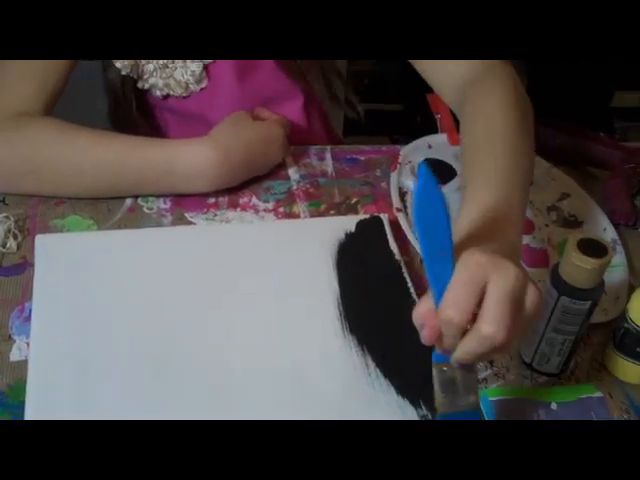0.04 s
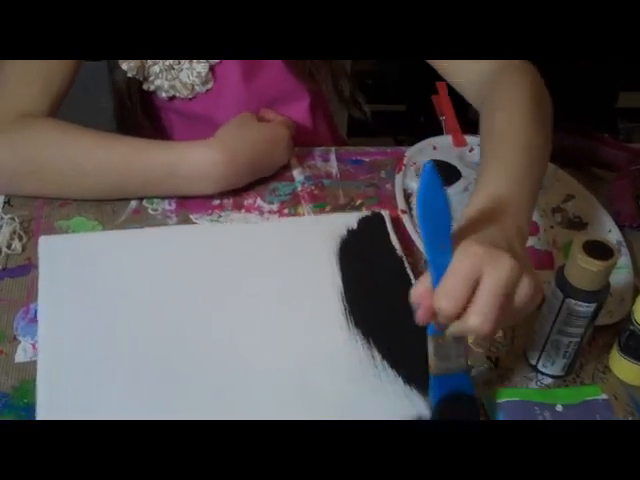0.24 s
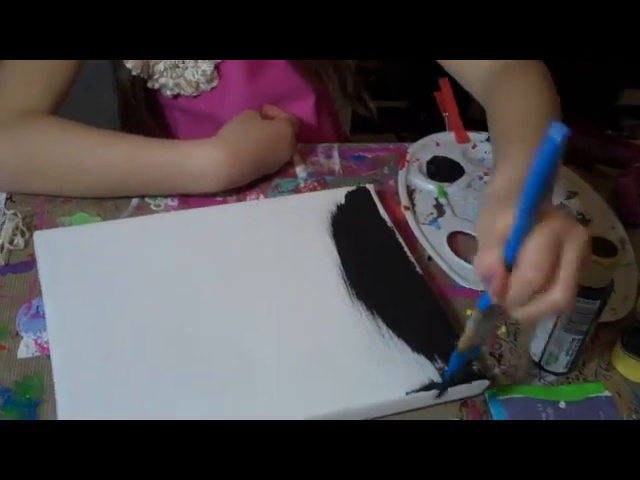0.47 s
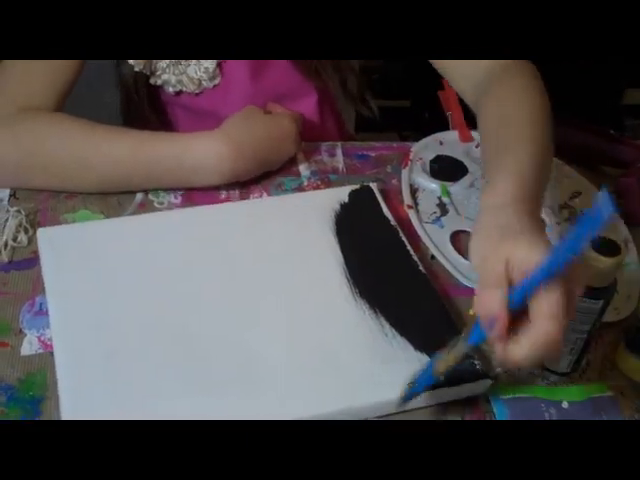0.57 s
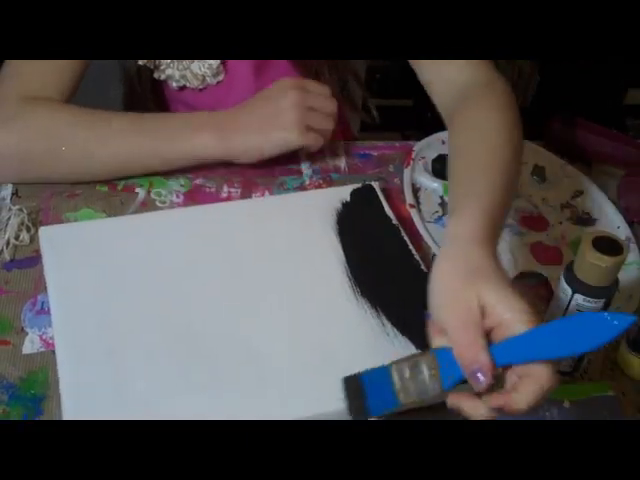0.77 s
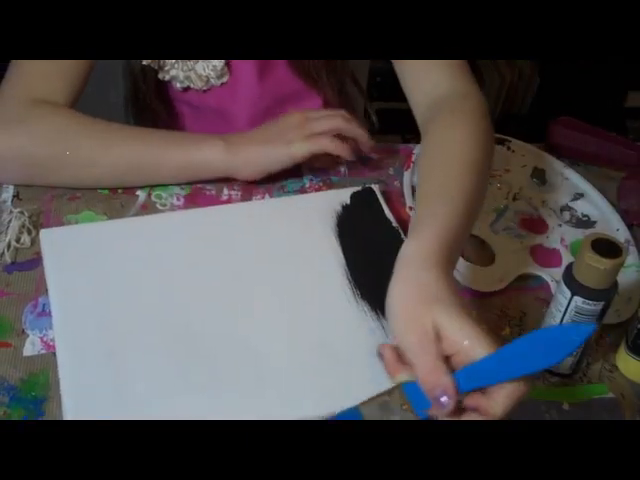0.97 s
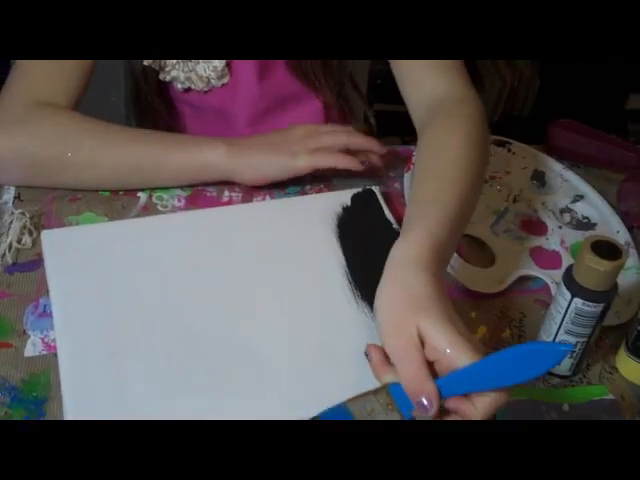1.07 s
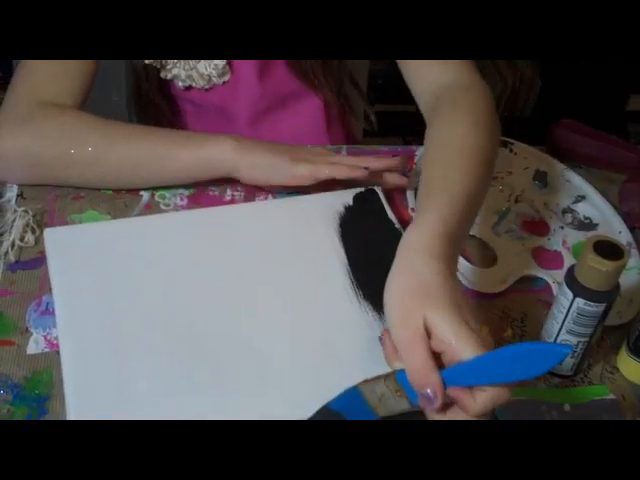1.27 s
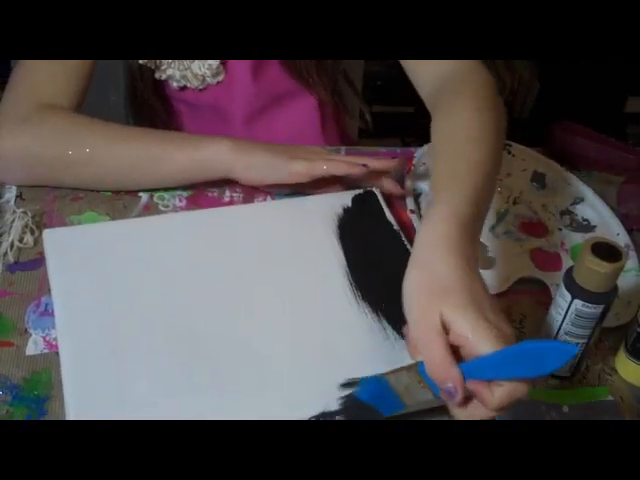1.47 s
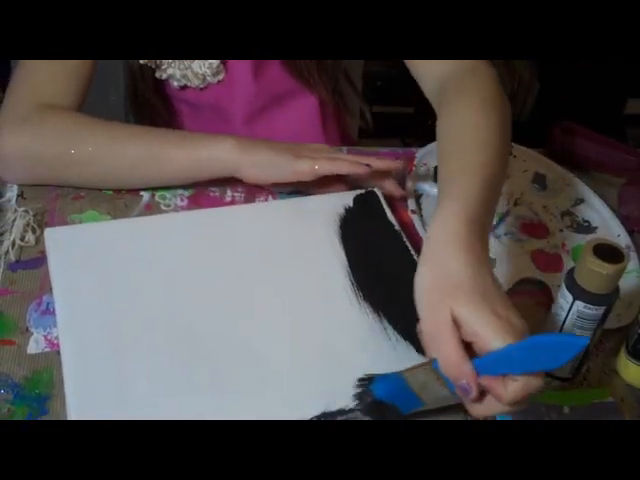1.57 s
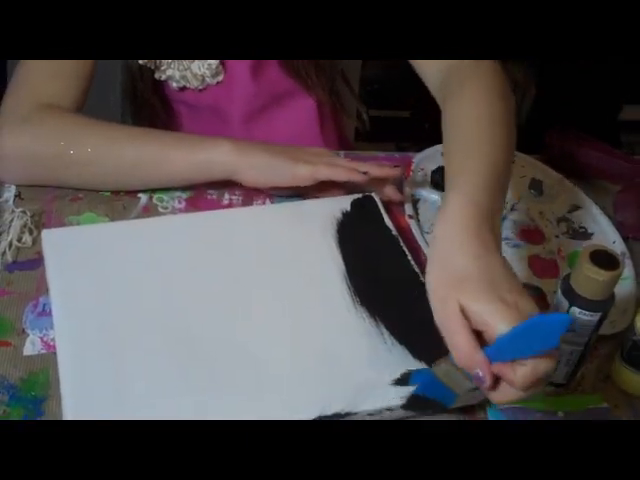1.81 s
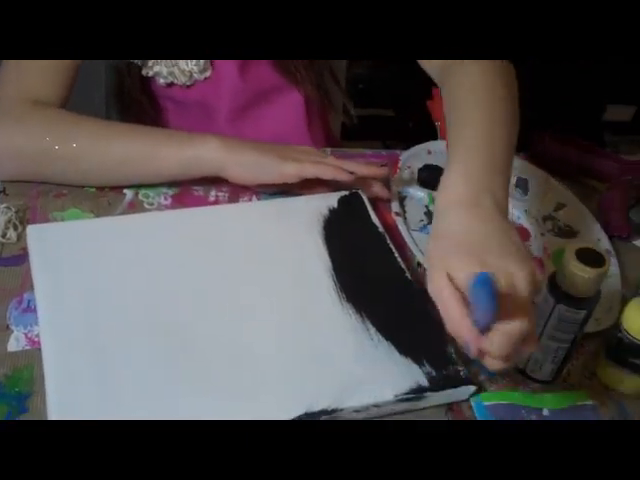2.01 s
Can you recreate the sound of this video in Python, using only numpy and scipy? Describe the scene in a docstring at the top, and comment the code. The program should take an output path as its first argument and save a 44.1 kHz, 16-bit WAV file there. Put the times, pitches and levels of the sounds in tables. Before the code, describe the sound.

Dry paintbrush strokes on a taut canvas, a sharp swish first, then quieter steady scratching

```python
"""Craft table in a quiet room: a wide brush scrubs a stretched canvas close to a small camera microphone.
Dense random clicks of bristles slipping on the weave are filtered into bright tips, a fuller belly,
airy splayed hairs and the drumming canvas; single tufts snap free as brief rings with broad ticks.
Short diffuse echoes from table and jars spread the brush wide; filtered noise and a wavering
mains hum make the room."""
import sys
import numpy as np
from scipy import signal
from scipy.fft import rfft, irfft
from scipy.io import wavfile
from scipy.ndimage import uniform_filter1d

SR = 44100
rng = np.random.default_rng(int(sys.argv[2]) if len(sys.argv) > 2 else 0)


def level_to_linear(level):
    """Convert decibel levels to linear amplitude factors, elementwise."""
    exponent = np.asarray(level, float) / 20
    return 10 ** exponent


def store_pcm(level_fs):
    """Save levels as 16-bit WAV."""
    pcm = np.round(np.clip(level_fs, -1, 1) * 32767).astype(np.int16)
    wavfile.write(sys.argv[1], SR, np.atleast_2d(pcm).T)


N = 90404  # samples

# Body of the bristles, flat on the weave: pitch_hz [Hz], density_db [dB per Hz, relative]
BELLY_COLOUR = [(200, -38), (330, -52), (380, -13.5), (440, -26), (620, -43), (780, -23), (950, -12.5),
                (1150, -15.5), (1350, -21), (1600, -15.5), (2000, -21), (2250, -11.5), (2550, -9.5),
                (2950, -11), (3400, -9.5), (4600, -9.5), (5800, -7.5), (7000, -2.5), (8000, -4.5),
                (9000, -14), (11500, -26)]


def level(x, db):
    """Set the rms level."""
    return x * level_to_linear(db) / np.sqrt(np.mean(x ** 2))


def colour(x, table):
    """Causal minimum-phase filter through (Hz, dB) points, joined on a log frequency axis."""
    points = np.array(table, float)
    hz = np.maximum(np.arange(1025) * SR / 2048, 1)
    gain_db = np.interp(np.log(hz), np.log(points[:, 0]), points[:, 1])
    cepstrum = irfft(np.log(level_to_linear(gain_db)))
    # folding the cepstrum onto positive times makes the filter causal
    cepstrum[1:1024] *= 2
    cepstrum[1025:] = 0
    impulse = irfft(np.exp(rfft(cepstrum)))
    return signal.fftconvolve(x, impulse)[:N]


def ring(x, hz, width_hz):
    """One resonance, gain 1 at its centre."""
    return signal.lfilter(*signal.iirpeak(hz, hz / width_hz, SR), x)


def ring_twice(x, hz, width_hz):
    """Two equal resonances in a row, for steeper skirts."""
    return ring(ring(x, hz, width_hz), hz, width_hz)


def walk(rate):
    """Random levels held 1 / rate s and slewed twice; spread 1."""
    hold = int(SR / rate)
    steps = np.repeat(rng.standard_normal(N + 1)[:N // hold + 1], hold)
    smooth = uniform_filter1d(uniform_filter1d(steps, hold), hold)[:N]
    return smooth / smooth.std()


def control(column):
    """One column of the stroke table at every sample."""
    # Brush strokes: time_s [s], scratch_db [dB], flatness [0 tips only to 1 whole belly],
    # drum_db [canvas, dB relative to scratch], airy_db [splayed hairs, dB relative to scratch]
    strokes = np.array([(0, -58, .6, -12, -20), (.07, -66, .6, -12, -20), (.109, -62, .4, -16, -20),
                        (.115, -50, .2, -18, -20), (.138, -47, .2, -18, -20), (.146, -58, .4, -12, -20),
                        (.166, -60, .4, -12, -20), (.174, -43, .4, -12, -16), (.195, -32, .4, -10, -14),
                        (.225, -27, .4, -10, -14), (.255, -22, .4, -11, -14), (.28, -22, .4, -12, -14),
                        (.305, -27, .4, -11, -14), (.325, -36, .5, -8, -14), (.35, -45, .7, -7, -16),
                        (.39, -55, .6, -9, -20), (.45, -66, .5, -12, -20), (.52, -65, .3, -18, -14),
                        (.55, -48, .05, -24, -10), (.58, -40, .05, -25, -10), (.6, -47, .2, -24, -10),
                        (.62, -45, .2, -24, -12), (.66, -55, .3, -20, -16), (.71, -61, .3, -16, -18),
                        (.753, -57, .3, -16, -18), (.7545, -44, .6, -8, -4), (.759, -49, .3, -10, -14),
                        (.775, -50, .3, -13, -18), (.8, -50, .3, -14, -18), (.835, -57, .3, -14, -18),
                        (.855, -52, .3, -16, -18), (.88, -58, .3, -16, -18), (.94, -50, .3, -20, -14),
                        (.99, -57, .3, -16, -14), (.997, -47, .3, -22, -6), (1.0095, -46, .3, -24, -4),
                        (1.0125, -33, .35, -28, 0), (1.03, -38, .4, -26, -3), (1.05, -47, .4, -22, -6),
                        (1.07, -54, .4, -18, -10), (1.092, -49, .3, -22, -10), (1.102, -44, .4, -24, -8),
                        (1.14, -42, .35, -26, -4), (1.175, -37, .2, -28, -1), (1.215, -41, .4, -26, -4),
                        (1.255, -38, .4, -26, -3), (1.29, -42, .6, -24, -12), (1.36, -39, .7, -36, -16),
                        (1.46, -36, .7, -36, -18), (1.5, -38, .7, -36, -18), (1.56, -34, .7, -36, -16),
                        (1.63, -37, .7, -36, -18), (1.72, -39, .8, -36, -18), (1.78, -34, .7, -36, -16),
                        (1.82, -38, .7, -36, -18), (1.85, -40, .6, -34, -16), (1.88, -46, .6, -32, -16),
                        (1.905, -53, .4, -28, -16), (1.925, -63, .5, -20, -18), (1.97, -78, .5, -14, -18)])
    return np.interp(np.arange(N) / SR, strokes[:, 0], strokes[:, column])


def slips():
    """Bristles letting go of the weave: dense random clicks of uneven strength, in slight patches."""
    slips_per_s, spread_db, patchy_db = 14000, 0.5, 0.3
    happens = rng.random(N) < slips_per_s / SR
    strength = rng.standard_normal(N)
    size = np.minimum(rng.exponential(size=N), 5)
    return happens * strength * level_to_linear(spread_db * size + patchy_db * walk(98.7))


def bristle_tips():
    """Thin bright scratch of the tips, its spectral peak sliding as the brush tilts."""
    # Colour of the tips before sliding: pitch_hz [Hz], density_db [dB per Hz, relative]
    tip_colour = [(1180, -66), (2000, -32), (3290, -34), (5180, -14.5), (7360, 2.5), (9580, -14.5),
                  (11500, -26), (15000, -56), (22000, -120)]
    # Where the tips sing brightest as the brush tilts: time_s [s], pitch_hz [Hz]
    tip_peak = [(.1, 7350), (.26, 7300), (0.349, 7150), (0.579, 7300), (.83, 7300), (0.949, 6950),
                (1.0, 7800), (1.04, 7700), (1.099, 7100), (1.181, 6950), (1.299, 6800), (1.531, 6900),
                (1.71, 7000), (1.78, 7400), (1.902, 7500)]
    wander_hz = 90
    tips = level(colour(slips(), tip_colour), 0)
    peak_hz = np.interp(np.arange(N) / SR, *np.array(tip_peak).T) + wander_hz * walk(30)
    slide_hz = peak_hz - max(tip_colour, key=lambda row: row[1])[0]
    # a single-sideband shift moves the whole spectrum by slide_hz
    return np.real(signal.hilbert(tips) * np.exp(2j * np.pi * np.cumsum(slide_hz) / SR))


def brush_belly():
    """Fuller scratch of the bristle bodies lying on the weave."""
    return level(colour(slips(), BELLY_COLOUR), 0)


def canvas_drum():
    """Slips drive the resonances of the stretched canvas, summed with alternating signs."""
    # Canvas resonances: pitch_hz [Hz], width_hz [Hz, before the 0.97 trim], gain_db [dB, relative]
    modes = [(218, 72, -5.5), (259.6, 44, 0), (341, 88, 5), (461, 40, 1.5), (567, 214, -6), (861, 144, 1.5),
             (1060, 250, -9), (1580, 620, -3.5), (2075, 190, -13.5)]
    push = slips()
    drum = np.zeros(N)
    for k, (hz, width_hz, db) in enumerate(modes):
        drum += (-1) ** k * level_to_linear(db) * ring_twice(push, hz, 0.97 * width_hz)
    return level(drum, 0)


def airy_hairs():
    """Splayed hairs: slips through one broad treble resonance."""
    return level(ring_twice(slips(), 8540, 2370), 0)  # centre Hz, width Hz of each pass


def scratch():
    """Flatness crossfades tips into belly by power; canvas and hairs follow the scratch level."""
    flat = np.clip(control(2), 0, 1)
    contact = np.sqrt(1 - flat) * bristle_tips() + np.sqrt(flat) * brush_belly()
    drum = level_to_linear(control(3)) * canvas_drum()
    airy = level_to_linear(control(4)) * airy_hairs()
    return level_to_linear(control(1)) * (contact + drum + airy)


def echoes(x):
    """Close reflections from table and jars: four short random tails, their mix slowly rotating and wandering."""
    t60_s = 0.041
    t = np.arange(4096) / SR
    tails = rng.standard_normal((4, 4096)) * level_to_linear(-60 * t / t60_s)
    # about 3 turns per s, so that no fixed colour stands out
    turn = np.cumsum(3.006 + walk(3.91)) * 2 * np.pi / SR
    wet = np.zeros(N)
    for k, tail in enumerate(tails):
        # the squared shares of the four tails always add to 1
        share = np.cos(turn + k * np.pi / 4) / np.sqrt(2)
        wet += signal.fftconvolve(x * share, tail / np.sqrt(np.sum(tail ** 2)))[:N]
    return wet


def room():
    """Still air as wide filtered noise with a drifting level, and a wavering mains hum in the centre."""
    # Colour of the air: pitch_hz [Hz], density_db [dB per Hz, relative]
    air_colour = [(18, -86), (30, -4), (60, -11), (127, -7), (231, -12), (441, -11), (625, -10.5),
                  (886, -11), (3150, -17.5), (11500, -19.5), (15000, -66), (22000, -120)]
    # Width of the air: pitch_hz [Hz], side_db [dB, side minus mid]
    air_width = [(60, 4), (110, -16), (190, -1), (350, 1.5), (620, -0.5), (1120, -1), (2000, -0.5),
                 (3600, -1.5), (6450, -0.5), (11600, -5)]
    air_db, hum_hz, hum_db = -61, 117.5, -69.5  # rms of mid air, centre hum level
    mid, side = (colour(rng.standard_normal(N), air_colour) * level_to_linear(1.0 * walk(6.55)) for _ in range(2))
    gain = level_to_linear(air_db) / mid.std()
    air = gain * (mid + colour(side, air_width) * np.array([[1], [-1]]))
    phase = 2 * np.pi * hum_hz * np.arange(N) / SR + 0.3 * walk(16.5)
    hum = level_to_linear(hum_db + 1.3 * walk(25.4)) * np.sqrt(2) * np.sin(phase)
    return air + hum


def catches():
    """Tufts catch and snap free: each a brief ring with a broad tick under one bell-shaped envelope."""
    # Snaps: centre_s [s], ring_db [dB, envelope peak], ring_hz [Hz], length_s [s, centre to 1/e]
    snaps = [(.1755, -33, 7100, .0008), (.1935, -24, 6800, .0006), (.2237, -16, 7300, .0007),
             (.2540, -11, 7400, .0011), (.2703, -11, 7400, .0006), (.2800, -12, 7300, .0006),
             (.2990, -19, 7400, .001), (.3620, -33, 7100, .001), (.4222, -38, 8000, .0004),
             (.7541, -28, 10500, .00005), (.7547, -30, 7000, .00025), (.7552, -33, 2000, .00012),
             (.7561, -36, 7300, .0008), (.8037, -37, 7300, .0006), (1.0127, -21, 8000, .0003),
             (1.0142, -17, 8400, .0003), (1.0160, -31, 3400, .0004), (1.0190, -22, 8500, .0003),
             (1.0230, -23, 8800, .0004), (1.4240, -27, 7000, .0006), (1.4910, -25, 5000, .0001),
             (1.5325, -24, 6800, .0005)]
    tick_db = -24  # gain of the ticks
    rings, ticks = np.zeros(N), np.zeros(N)
    t = (np.arange(512) - 256) / SR
    for centre_s, db, hz, length_s in snaps:
        first = int(centre_s * SR) - 256
        envelope = level_to_linear(db) * np.exp(-(t / length_s) ** 2)
        rings[first:first + 512] += envelope * np.sin(2 * np.pi * hz * t)
        ticks[first:first + 512] += envelope * rng.standard_normal(512)
    return rings + level_to_linear(tick_db) * colour(ticks, BELLY_COLOUR)


def fold(x):
    """In the narrow spells the side all but loses a treble band and is turned down around it."""
    # Spells folding to the centre: start_s [s], end_s [s], below_db and above_db [side gain around the gap, dB]
    spells = [(0.113, 0.312, -12, -6.5), (0.379, 0.483, -1, -18), (0.703, 0.867, -1, -9),
              (1.014, 1.051, -9.5, -21), (1.15, 1.462, -9, -13), (1.522, 1.788, -7, -12.5)]
    gap_hz, gap_db = (3950, 8050), -40
    t = np.arange(N) / SR
    mid, side = (x[0] + x[1]) / 2, (x[0] - x[1]) / 2
    below, up_to_top = (signal.sosfiltfilt(signal.ellip(10, .1, 50, hz, fs=SR, output="sos"), side)
                        for hz in gap_hz)
    bands = [below, up_to_top - below, side - up_to_top]
    gains = np.ones((3, N))
    for start_s, end_s, below_db, above_db in spells:
        gains[:, (t > start_s) & (t < end_s)] = level_to_linear(np.array([[below_db], [gap_db], [above_db]]))
    side = np.sum(uniform_filter1d(gains, size=600) * bands, axis=0)
    return np.array([mid + side, mid - side])


def scene():
    """Brush a little left of centre, its reflections spread wide, over the room."""
    # Spread of the reflections: pitch_hz [Hz], side_db [dB, gain of the side echoes]
    spread = [(60, 2), (110, -4), (190, -32), (350, -4), (620, -26), (1120, -17), (2000, -10), (3600, 1.5),
              (6450, -6), (11600, -1.5)]
    # Lean to the left: pitch_hz [Hz], lean_db [dB by which the left port hears the brush louder]
    lean = [(100, 3), (2000, 2.5), (5000, 7), (8000, 0.5), (11500, 15)]
    brush = scratch() + catches()
    mid = brush + level_to_linear(-11.5) * echoes(brush)
    side = colour(echoes(brush), spread)
    ports = [colour(mid, [(hz, sign * db / 2) for hz, db in lean]) for sign in (1, -1)]
    return np.array(ports) + side * np.array([[1], [-1]]) + room()


def band_limit(x):
    """A steep low-pass at the top of the band."""
    return signal.sosfilt(signal.butter(12, 12180, fs=SR, output="sos"), x)


def record(dry):
    """The stereo side thins in some spells; the top is cut steeply."""
    top_hz = 11450
    mix = signal.sosfilt(signal.ellip(12, .2, 80, top_hz, fs=SR, output="sos"), fold(dry))
    return band_limit(mix)


dry = scene()
out = record(dry)
store_pcm(out)
```